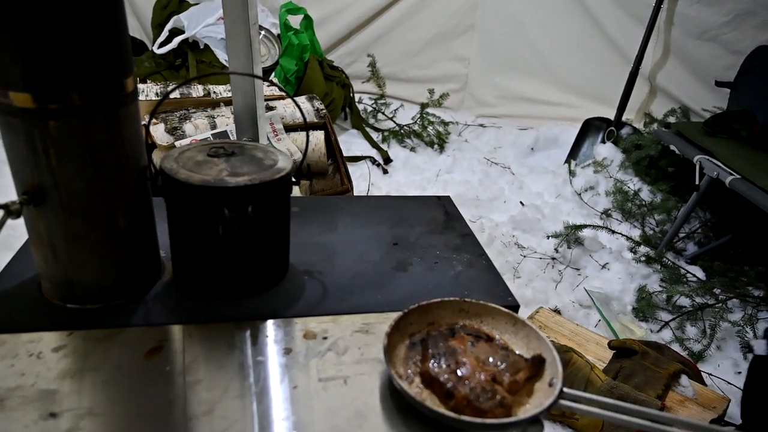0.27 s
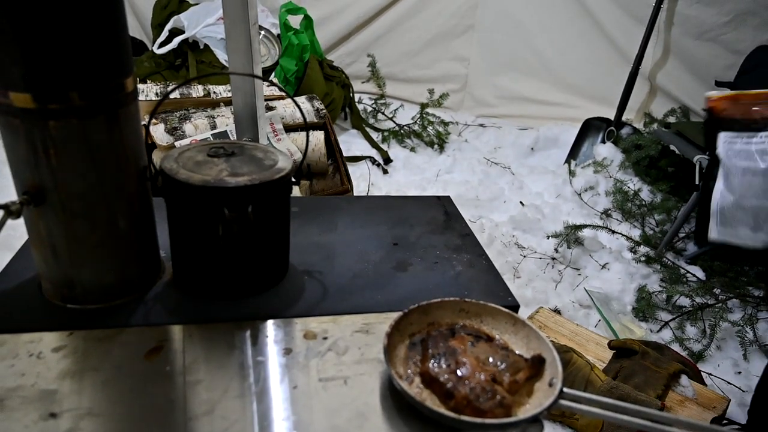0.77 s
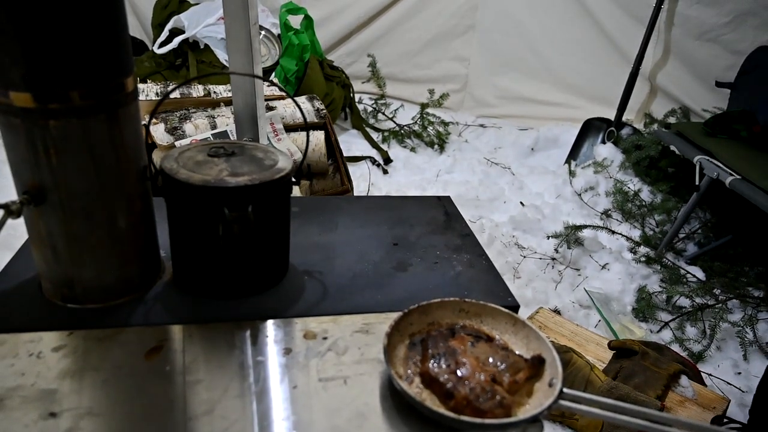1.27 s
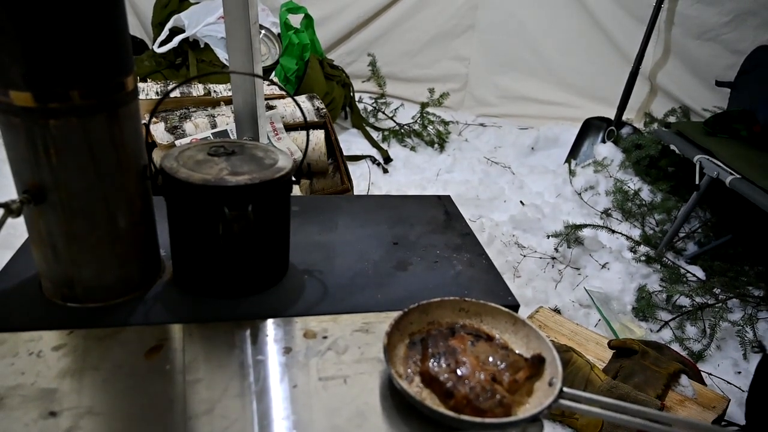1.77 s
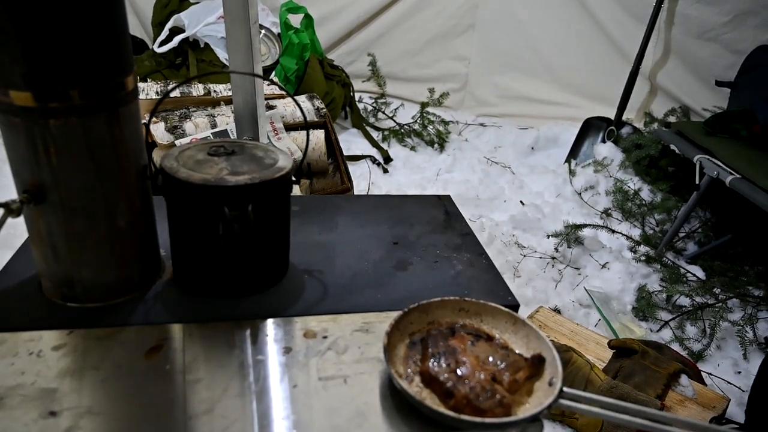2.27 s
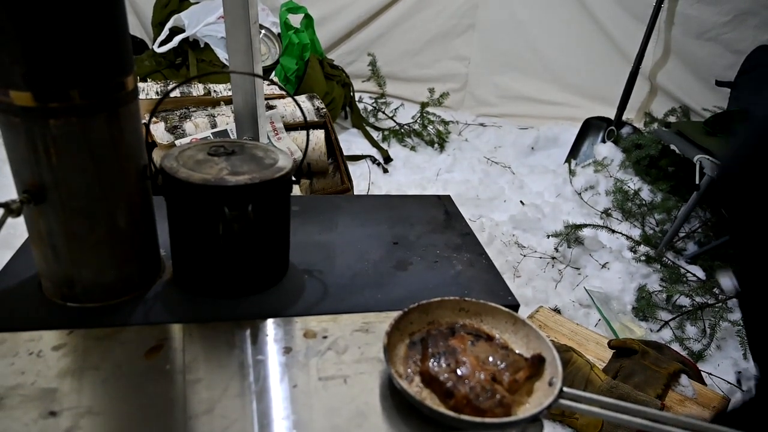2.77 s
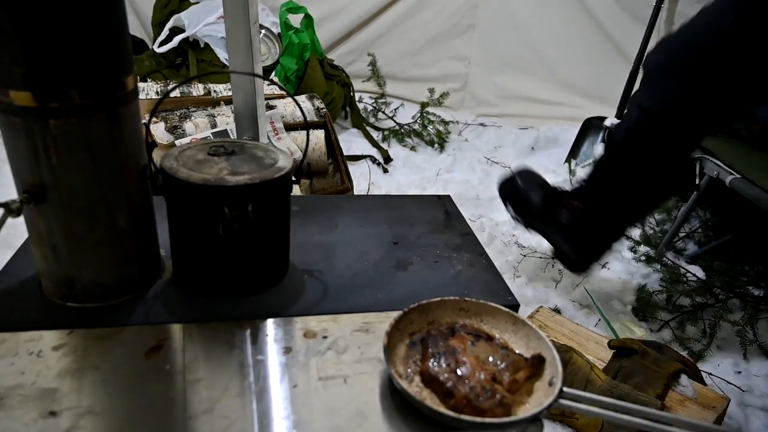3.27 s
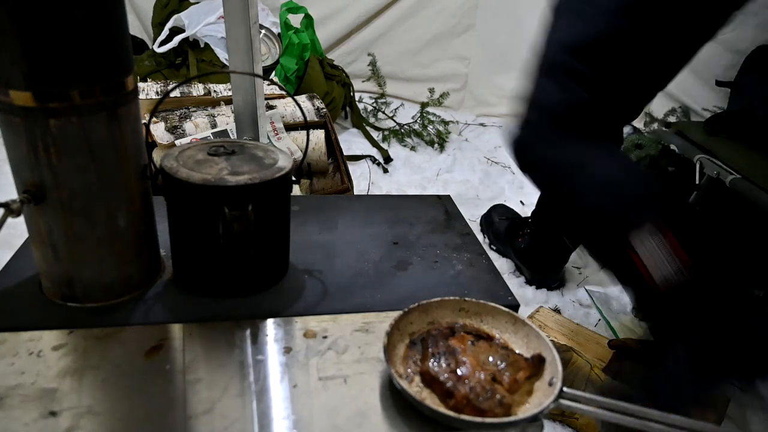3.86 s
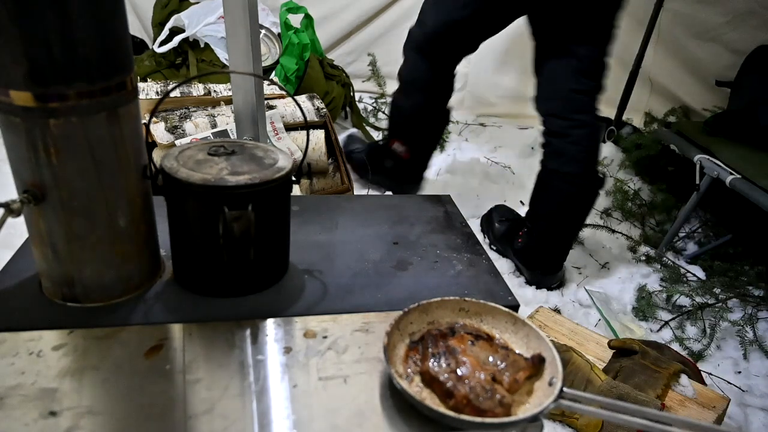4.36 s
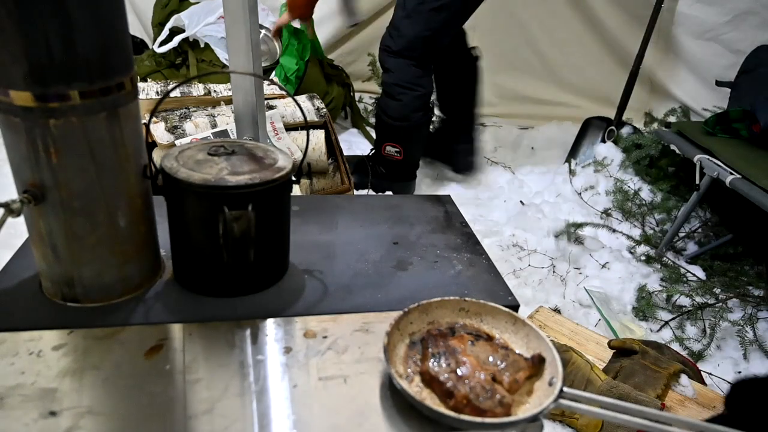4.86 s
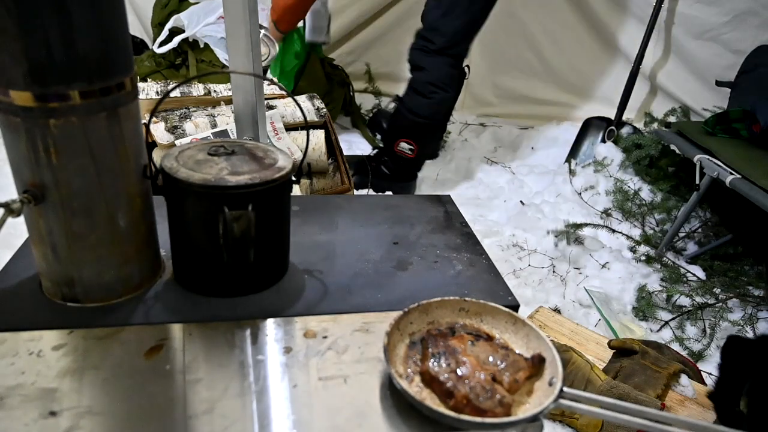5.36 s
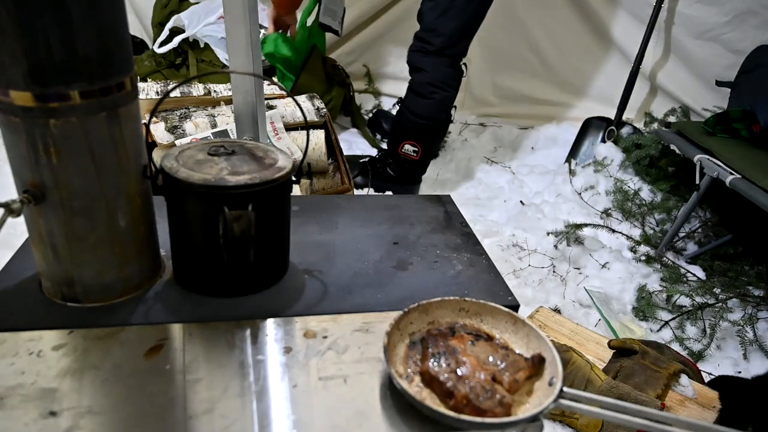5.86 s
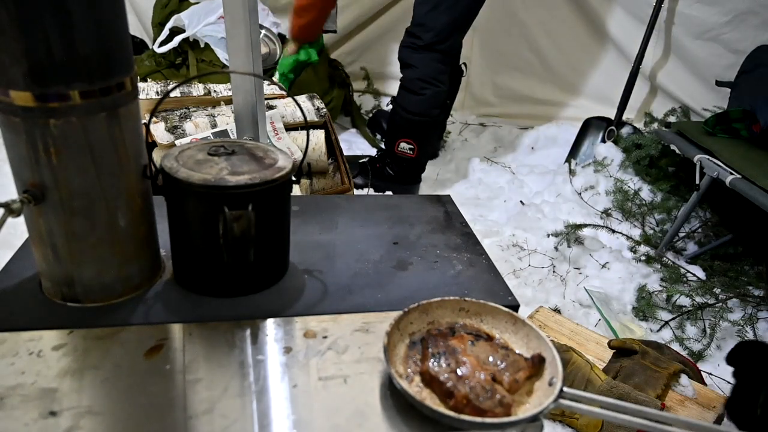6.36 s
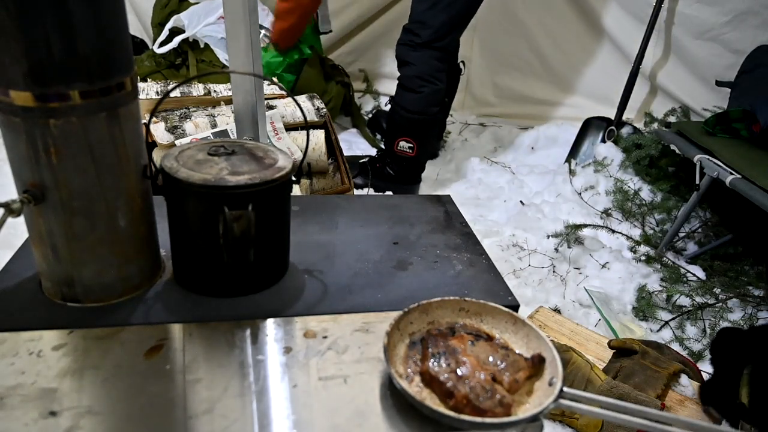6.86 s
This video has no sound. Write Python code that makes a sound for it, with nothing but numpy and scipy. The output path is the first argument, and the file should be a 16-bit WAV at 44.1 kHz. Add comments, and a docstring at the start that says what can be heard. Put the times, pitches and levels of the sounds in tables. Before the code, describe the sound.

Inside a small canvas tent, boots and cloth shift lightly on packed snow, with early small snaps and muffled thuds. The movement thickens into crisp crunching steps, hardest in the middle, then dwindles to shuffles and scattered ticks. A wood stove draws softly throughout. Close stereo microphone, short dry tail, steps drifting slightly from right to left.

```python
"""Winter boots shuffle and step on packed snow and twigs inside a small canvas tent.
Snow crunch and cloth rustle are swelling streams of random grains; settling weight adds darker grains.
Heels thud as wobbling low sines, rubber and dry snow squeak as noise in narrow resonances.
Twigs and buckles snap as short resonant noise bursts; a hard buckle or pole rings when tapped.
A wood stove draws softly nearby as fluttering filtered noise; near canvas walls add a short tail."""
import sys
import numpy as np
from scipy import signal
from scipy.io import wavfile
from scipy.ndimage import uniform_filter1d, map_coordinates

SR = 44100
rng = np.random.default_rng(int(sys.argv[2]) if len(sys.argv) > 2 else 0)


def voltage_ratio(level):
    """Linear amplitude factor for a level in decibels (scalar or array-like)."""
    return 10 ** (np.asarray(level, float) / 20)


def output_pcm(signal):
    """Save a mono or channel-first signal as 16-bit PCM at the path in sys.argv[1].

    Samples are clipped to [-1, 1] before scaling.
    """
    pcm = np.clip(np.atleast_2d(signal).T, -1, 1) * 32767
    wavfile.write(sys.argv[1], SR, np.round(pcm).astype(np.int16))


N = 313992  # samples

# boot soles and cloth drag: top of the stroke t/s, rise t/s, fall t/s, relative crush level/dB,
# fine fizz over the crush level/dB
DRAG_STROKES = [(0.112,0.053,.12,-56,-16),(0.17,0.054,0.11,-56,-11),(0.284,0.33,0.14,-44.5,-7.5),(0.436,0.088,.12,-60,3),(0.58,0.041,.07,-56,0.5),
                (0.668,0.04,0.12,-45,-6),(0.714,0.11,0.019,-44.5,-2),(0.818,0.018,0.14,-42,-6),(0.874,0.082,0.028,-38.5,1),(1.134,0.087,0.22,-48.5,0.5),
                (1.19,.15,0.15,-47.5,-10),(1.353,0.0088,0.078,-35,-1),(1.397,0.043,0.056,-45.5,-2),(1.55,0.09,0.042,-48,-2.5),(1.644,.05,0.31,-52,-2),
                (1.748,.04,.06,-53,0),(1.99,0.04,0.13,-58,-4),(2.07,0.022,.018,-49.5,-12),(2.136,0.033,.025,-37,-7),(2.25,0.055,0.28,-52.5,-7.5),
                (2.44,0.12,0.11,-42,-0.5),(2.49,.07,0.046,-40.5,-9),(2.52,0.014,0.045,-34,-7.5),(2.612,0.017,0.059,-37,-1.5),(2.664,0.014,0.062,-33,-0.5),(2.735,0.023,0.053,-39.5,3),
                (2.798,0.009,0.092,-41,-7),(2.9,0.31,0.16,-47,-3),(2.97,0.088,.18,-44,-5.5),(3.054,.1,.25,-51,-6.5),(3.17,0.13,0.15,-51,-1),
                (3.225,0.037,0.19,-46,0),(3.317,0.042,0.05,-39.5,-3.5),(3.364,.005,0.039,-40.5,10),(3.445,0.16,.03,-53.5,-19),(3.495,0.019,0.015,-33.5,-8),
                (3.575,0.01,.15,-49.5,11),(3.649,0.082,0.066,-35,3),(3.76,0.081,0.079,-49,3.5),(3.81,.07,.03,-57,-13),(3.83,0.016,0.018,-39,7.5),
                (3.864,0.01,0.18,-33.5,-6),(3.942,0.22,0.04,-33.5,-11),(3.986,0.0078,0.031,-34,0.5),(4.04,.1,0.17,-57,-5),(4.112,0.055,.15,-53,0),
                (4.24,0.067,.1,-53.5,6.5),(4.286,0.14,0.15,-48,0.5),(4.432,0.031,0.17,-44,5.5),(4.484,0.089,0.084,-40,0),(4.54,.02,0.039,-33.5,-3.5),
                (4.64,0.31,0.16,-47.5,2.5),(4.8,0.14,.1,-57,1.5),(4.89,0.044,0.016,-48.5,-5),(4.959,0.021,0.25,-39.5,6.5),(4.999,0.065,0.22,-43,-1),
                (5.061,0.11,0.034,-32.5,-11),(5.11,0.077,0.066,-45.5,3),(5.16,0.013,0.22,-38,-3),(5.376,.2,0.12,-39.5,-5.5),(5.466,0.24,0.18,-49,0),
                (5.54,0.18,.07,-47.5,1),(5.626,0.087,0.54,-52,-4),(5.828,0.033,0.11,-48,5.5),(5.87,0.31,0.036,-50.5,-8),(6.256,0.075,0.11,-53,-3),
                (6.33,.04,0.077,-53,1),(6.504,.16,0.087,-45,-3.5),(6.578,0.16,.1,-45.5,-3),(6.712,0.16,0.45,-55.5,-5),(6.815,0.026,0.044,-42.5,-2.5),
                (6.99,0.012,0.068,-39.5,-3),(7.056,0.061,0.29,-33.5,-2)]
# weight settles on the snow: top of the stroke t/s, rise t/s, fall t/s, relative weight level/dB,
# floor rumble over the weight level/dB
WEIGHT_STROKES = [(0.005,.02,0.078,-52,1),(0.112,.05,0.18,-58.5,10),(0.436,0.14,0.16,-53.5,-8),(0.714,0.16,0.025,-46.5,-25),(0.802,0.0091,0.023,-44,-17),
                  (1.134,0.15,0.1,-46,-14),(1.353,0.0076,0.061,-29.5,-17),(1.397,0.063,0.03,-37,-10),(1.55,.03,0.04,-48.5,-16),(1.6,0.038,.05,-67,18.5),
                  (1.644,0.047,0.081,-51,-18),(1.834,0.081,0.18,-60,-9),(2.07,0.029,.03,-45.5,-25),(2.136,0.035,0.019,-32,-18),(2.44,0.13,.15,-37.5,-24),
                  (2.518,.15,0.041,-37.5,-25),(2.664,0.014,0.2,-40.5,-9),(3.17,.07,.05,-64,10),(3.445,0.092,0.045,-63.5,8),(3.495,0.022,0.034,-30,-11),
                  (3.649,0.08,0.078,-35,-0.5),(3.759,.1,0.095,-41.5,-11),(3.83,0.021,.025,-35,-28),(4.24,0.042,0.054,-54,-7),(4.484,0.077,0.049,-36.5,-0.5),
                  (4.54,0.015,.055,-36,1),(4.64,0.28,0.11,-45.5,-1),(4.999,.12,0.15,-41,-5),(5.107,0.13,0.068,-41.5,1),(5.278,0.07,0.13,-55.5,0),
                  (5.466,0.25,0.12,-48.5,0),(5.57,0.11,0.042,-52.5,-10),(6.39,0.045,0.11,-58.5,3),(6.666,.05,.05,-68,15),(6.879,0.018,0.05,-53,1)]
# spectrum of crushed snow: f/Hz, relative density level/dB
CRUSH_SPECTRUM = [(290, -21.5), (500, -6), (981, -2), (1130, -4.5), (1350, -0.5), (1540, -3.5),
                  (2200, -1.5), (7000, -14.5), (9100, -36), (15400, -120)]
# spectrum of snow under load: f/Hz, relative density level/dB
WEIGHT_SPECTRUM = [(76, -24), (130, -9.5), (199, -9.5), (273, -3), (308, -3.5), (384, -1.5), (514, -11.5),
                   (589, -4.5), (1000, -12.5), (1300, -44), (2200, -120)]
# spectrum of the fine fizz: f/Hz, relative density level/dB
FIZZ_SPECTRUM = [(2500, -26.5), (4000, 1.5), (6000, 3), (8000, 0), (11000, -1), (15000, -1.4), (18000, -19)]
# spectrum of the shaking floor: f/Hz, relative density level/dB
RUMBLE_SPECTRUM = [(25, -50), (45, -0.5), (60, -1), (75, -3.5), (120, -6.5), (180, -30)]
# spectrum of the stove draught: f/Hz, relative density level/dB
STOVE_SPECTRUM = [(15, -27), (25, -20), (145, 5), (236, -11), (416, -6), (560, -12), (775, -9.5),
                  (887, -14), (1330, -13.5), (2610, -20), (3080, -20), (11000, -27), (14800, -24.5),
                  (16000, -19.5)]
# heel and sole thuds: t/s, peak of the snow pack level/dB, deep push over the pack level/dB,
# pack decay t60 t/s, nominal pitch f/Hz
THUDS = [(0.086, -44, 3, 0.2, 178), (0.522, -36, -5.5, 0.13, 317), (0.743, -37, -30, 0.08, 241),
         (1.347, -27.5, -31, 0.1, 252), (1.378, -27.5, -26, 0.069, 376), (1.496, -39, -7, 0.14, 418),
         (2.122, -30.5, -12, 0.1, 420), (2.391, -29, -36, 0.11, 378), (2.469, -26.5, -38, 0.094, 355),
         (2.654, -31, -20, 0.13, 272), (3.046, -33.5, -27, 0.045, 489), (3.482, -12.5, -2, 0.032, 375),
         (3.629, -24.5, -22, 0.14, 309), (3.746, -27, -18, 0.075, 285), (3.808, -39, -32, 0.091, 273),
         (4.226, -42.5, -21, 0.13, 418), (4.464, -31, -27, 0.23, 314), (4.528, -18, -8, 0.055, 256),
         (4.956, -40, 1.5, 0.15, 344), (6.867, -46, 4, 0.048, 171)]
# modes of packed snow under a blow: multiple of the pitch, relative level/dB
PACK_MODES = [(1, 10), (1.25, -5.5), (2.1, -2.5), (3.1, -8.5)]
# rubber and dry snow squeak: t/s, length t/s, f/Hz, rms before the fades level/dB
SQUEAKS = [(0.103, 0.097, 3900, -55.5), (0.204, 0.052, 482, -49.5), (0.276, 0.057, 638, -49),
           (0.839, 0.014, 716, -44), (.85, 0.051, 2650, -42.5), (.855, 0.041, 2120, -42),
           (3.693, 0.036, 1630, -47), (3.704, 0.03, 4050, -49.5), (4.602, .04, 680, -55),
           (5.158, 0.083, 1354, -43), (5.81, .06, 2220, -50.5)]
# sharp snaps: t/s, body peak level/dB, ring f/Hz, gain of the added treble level/dB, decay t60 t/s
SNAPS = [(0.5272,-13,2740,-25,0.059),(0.751,-12,2460,-33,.021),(1.039,-36.5,1890,-62,0.061),(1.071,-47,4000,-45,.05),(1.295,-44,2050,-60,.05),
         (1.347,-20,1030,-35,0.033),(1.505,-24.5,1090,-42,0.12),(1.6322,-34,1100,-42,0.046),(2.0069,-31.5,2020,-49,0.075),
         (2.0457,-24,4830,-41,0.043),(2.217,-30,3100,-39,0.039),(2.4423,-16,3130,-25,0.025),(2.4743,-20,3100,-47,.043),
         (2.4908,-14,2060,-43,.033),(2.504,-27,4500,-38,.02),(2.5138,-13,1880,-43,0.027),(2.6063,-20,2780,-33,0.057),(2.6165,-19,3500,-23.5,0.055),
         (2.665,-8.5,2610,-19.5,0.016),(2.7314,-16.5,2450,-23.5,0.016),(2.7945,-19.5,1500,-47,0.019),(2.9228,-16.5,2000,-37,0.039),
         (3.0944,-35,1840,-58,0.053),(3.1296,-33,2400,-54,0.037),(3.227,-26.5,2980,-46,.074),(3.2983,-26,4280,-46,.044),
         (3.313,-23.5,1710,-54,0.091),(3.359,-11.5,2270,-17.5,0.021),(3.482,-22,1050,-28,0.056),(3.787,-43,1900,-51.5,0.042),
         (3.816,-20,5400,-32,.02),(3.8215,-17.5,1660,-35,0.05),(3.8639,-10.5,1810,-33,0.04),(3.8678,-7.5,2030,-17.5,0.042),(3.913,-20,2150,-42,0.044),(3.928,-23.5,2400,-42,0.045),(3.945,-17,2170,-41,0.047),
         (3.9813,-18,2040,-34,0.035),(4.2138,-34.5,3690,-43,0.033),(4.2354,-26.5,1650,-37,0.033),(4.261,-34,3300,-55,.03),(4.276,-35,3400,-50,.03),(4.3103,-32,5500,-31,0.045),
         (4.5358,-25,1060,-34,.05),(4.8665,-31,1500,-58,.05),(4.927,-32,990,-40,.031),(5.112,-30,2500,-35,0.029),(5.3766,-26.5,3060,-37,0.053),
         (5.5558,-25.5,3150,-54,.031),(5.6116,-43,1060,-34,.037),(5.666,-38,910,-54,0.038),(5.773,-36,1990,-57,.036),(5.878,-29.5,1500,-59,0.054),
         (6.0216,-15,3100,-22,0.025),(6.244,-48,950,-36,0.04),(6.311,-32,1150,-36,0.05),(6.668,-50,6500,-46,.04),(6.7617,-61,1320,-37,0.046),
         (6.808,-25.5,4500,-44,0.041),(6.989,-27,3300,-45,.04),(7.003,-22,3000,-36,.02),(7.008,-20.5,1730,-42,0.037),(7.057,-22.5,1300,-28,.044)]
# modes of a hard buckle or pole: f/Hz, relative level/dB, decay t60 t/s
KNOCK_MODES = [(1500, -3, 0.035), (1820, 3, 0.019), (1900, 13.5, 0.024), (2060, -3, 0.097),
               (2480, 7.5, 0.026), (2740, 2.5, 0.032), (3400, -5, 0.024), (3700, -3, 0.023)]
# taps on that buckle or pole: t/s, peak level/dB
KNOCKS = [(2.9227, -12), (4.8664, -36), (5.8775, -28.5)]
# the walker moves off: t/s, delay of the left side in samples, left minus right level/dB
WALKER_PATH = [(0, 3., -2.5), (1.5, 2.5, -2.5), (2.7, 3, -2), (3.3, 3, -1), (3.8, 1.15, -0.4),
               (5.5, 0.6, 0), (6.2, -1.5, 1), (7.12, -1, 2)]


def evened(x):
    """Scales to rms 1."""
    return x / np.sqrt(np.mean(x ** 2) + 1e-20)


def add(mix, s, sound):
    """Mixes a sound in at s seconds, cut at the end of the scene."""
    part = mix[..., round(s * SR):][..., :sound.shape[-1]]
    part += sound[..., :part.shape[-1]]


def coloured(x, points):
    """Causal minimum-phase filter drawn through (f/Hz, level/dB) points, scaled to rms 1."""
    hz, db = np.transpose(points)
    bins = abs(np.fft.fftfreq(4096, 1 / SR))
    curve_db = np.interp(np.log(bins + 1), np.log(hz + 1), np.maximum(db, -80))
    log_gain = curve_db * np.log(10) / 20
    taps = np.fft.ifft(np.exp(np.conj(signal.hilbert(log_gain)))).real
    taps = taps.reshape((1,) * (x.ndim - 1) + (-1,))
    return evened(signal.oaconvolve(x, taps, axes=-1)[..., :N])


def resonate(x, hz, width):
    """A resonance of gain 1, width in Hz, that follows the pitch curve hz."""
    turn = np.exp(2j * np.pi * np.cumsum(hz) / SR)
    r = np.exp(-np.pi * width / SR)
    return 2 * (turn * signal.lfilter([1 - r], [1, -r], x / turn)).real


def sided(pan_db):
    """Left and right gains for a left-minus-right level in dB."""
    return voltage_ratio(np.array([pan_db / 2, -pan_db / 2]))


def swells(rows):
    """Powers of overlapping strokes add: level curves in dB of the main and of the second layer."""
    edge_db, rounding = -20, 1.204  # level one rise before and one fall after the top; curve power
    s, rise, fall, db, over_db = np.transpose(rows)[:, :, None]
    t = np.arange(0, N / SR + .002, .002)
    away = np.where(t < s, (s - t) / rise, (t - s) / fall)
    main = voltage_ratio(2 * (db + edge_db * away ** rounding))
    second = main * voltage_ratio(2 * over_db)
    time = np.arange(N) / SR
    return [np.interp(time, t, 10 * np.log10(p.sum(0) + 1e-9)) for p in (main, second)]


def grains(per_s, spread_db, smooth):
    """Crystals break at random, a few loudly, over a smooth bed."""
    size = voltage_ratio(spread_db * np.minimum(rng.exponential(1, N), 4))
    breaks = size * (rng.random(N) < per_s / SR) * rng.choice([-1., 1.], N)
    return evened(evened(breaks) + smooth * rng.standard_normal(N))


def strokes():
    """One stream of grains sounds as crush and fizz; sparser breaks carry the weight over a floor rumble."""
    drag_weight_db, idle_rumble_db = -10, -68.5  # every drag loads the snow; the floor is never still
    grit, clump_db = 0.35, 1.75  # share of grains; rms swing of the clumps in dB
    crush_db, fizz_db = swells(DRAG_STROKES)
    press_db, shake_db = swells(WEIGHT_STROKES)
    weight_db = np.maximum(press_db, crush_db + drag_weight_db)
    rumble_db = np.maximum(shake_db, idle_rumble_db)

    clumps = voltage_ratio(clump_db * evened(uniform_filter1d(rng.standard_normal(N), 300)))
    gritty = grit * grains(per_s=1200, spread_db=4.5, smooth=0.23)
    fine = clumps * (gritty + 0.5 * rng.standard_normal(N)) / np.hypot(grit, .6)
    patch = np.array([grains(per_s=1900, spread_db=2.0, smooth=0.53) for side in "LR"])
    spread = fine + 1.7 * clumps * patch  # a wide patch of snow
    coarse = 0.16 * fine + clumps * grains(per_s=400, spread_db=4.0, smooth=0.68)

    # the rasp sinks 0.2 octave per dB as weight outgrows the crush
    rasp_hz = 1500 * 2 ** (0.2 * np.maximum(crush_db - weight_db, -12))
    rasp = resonate(resonate(fine, rasp_hz, width=1200), rasp_hz, width=1200)
    crush = coloured(fine, CRUSH_SPECTRUM) + 0.25 * evened(rasp)
    upper = voltage_ratio(crush_db) * evened(crush) + voltage_ratio(fizz_db) * coloured(spread, FIZZ_SPECTRUM)
    weight = voltage_ratio(weight_db) * coloured(coarse, WEIGHT_SPECTRUM)
    rumble = voltage_ratio(rumble_db) * coloured(rng.standard_normal(N), RUMBLE_SPECTRUM)
    return voltage_ratio(-1.0) * (upper + weight + rumble)


def stove():
    """A low fluttering draught and a faint even hiss, mostly unlike at left and right."""
    flutter = voltage_ratio(3.1 * evened(uniform_filter1d(rng.standard_normal(N), 3000)))
    shared, left, right = rng.standard_normal((3, N))
    noise = np.array([shared + 2.64 * left, shared + 3.0 * right])
    air = voltage_ratio(-52) * coloured(noise, STOVE_SPECTRUM)
    low = signal.sosfiltfilt(signal.butter(1, 700, fs=SR, output="sos"), air)
    return air + (flutter - 1) * low  # only the low part flutters


def thuds():
    """The boot lands and shakes the snow pack in quick bumps, over one deep push."""
    push_hz = 130.2  # nominal, detuned in each thud
    out, t = np.zeros(N), np.arange(8000) / SR
    for s, db, deep_db, t60, hz in THUDS:
        detune = rng.uniform(.92, 1.08, len(PACK_MODES) + 1)
        fade = voltage_ratio(-60 * t / t60) * np.minimum(t / .003, 1)
        pack = np.zeros(len(t))
        for (multiple, mode_db), shift in zip(PACK_MODES, detune):
            pack += voltage_ratio(mode_db) * np.sin(2 * np.pi * hz * multiple * shift * t)
        wobble = uniform_filter1d(uniform_filter1d(rng.standard_normal(len(t)), 90), 90)
        bumps = 1 + 0.55 * evened(wobble)
        pack = -pack * bumps * fade  # the snow gives way first, then pushes back
        push = np.sin(2 * np.pi * push_hz * detune[-1] * t) * fade ** 0.62  # dies more slowly
        add(out, s, voltage_ratio(db) * (pack / abs(pack).max() + voltage_ratio(deep_db) * push / abs(push).max()))
    # keeps the thuds free of a slow offset below the low tones
    return signal.lfilter(*signal.butter(3, 60, "high", fs=SR), out)


def squeaks():
    """Brief fuzzy tones: rubbing noise in a narrow resonance."""
    out = np.zeros(N)
    for s, length, hz, db in SQUEAKS:
        rub = rng.standard_normal(round(length * SR))
        pitch = np.full(len(rub), hz)
        tone = resonate(resonate(rub, pitch, width=0.11 * hz), pitch, width=0.11 * hz)
        add(out, s, voltage_ratio(db) * evened(tone) * signal.windows.tukey(len(tone), .6))
    return out


def snaps():
    """A crack rings a short broad mode, then splinters settle."""
    ring_share = 0.39  # of the ring over the broad crack
    crack, crack_db_per_db = 2.52, 0.36  # first break against the splinters, sharper in a loud snap
    out, t = np.zeros(N), np.arange(6000) / SR
    treble = signal.butter(3, 4800, "high", fs=SR)
    middle = signal.butter(2, [800, 7000], "band", fs=SR)
    for s, db, hz, treble_db, t60 in SNAPS:
        splinters = 0.71 * rng.standard_normal(len(t)) * voltage_ratio(-60 * t / t60)
        drive = splinters * np.minimum(t / 0.0022, 1)
        drive[10:16] += crack * voltage_ratio(crack_db_per_db * (db + 19)) * rng.choice([-1., 1.], 6)
        ring = resonate(drive, np.full(len(t), hz), width=0.17 * hz)
        broad = signal.lfilter(*middle, drive)
        top = signal.lfilter(*treble, drive)
        body = ring_share * ring / abs(ring).max() + (1 - ring_share) * broad / abs(broad).max()
        add(out, s, voltage_ratio(db) * body / abs(body).max() + voltage_ratio(treble_db) * top)
    return out


def knock():
    """A few close modes of a hard body start together, each dying at its own rate."""
    out, t = np.zeros(N), np.arange(6000) / SR
    ring = sum(voltage_ratio(db - 60 * t / t60) * np.sin(2 * np.pi * hz * t) for hz, db, t60 in KNOCK_MODES)
    ring = ring * np.minimum(t / 0.00082, 1)  # the blow lasts a moment
    for s, db in KNOCKS:
        add(out, s, voltage_ratio(db) * ring / abs(ring).max())
    return out


def tent(x, t60, wet_db):
    """Near canvas walls return a short dense tail, unlike at left and right and ever shifting."""
    t, out = np.arange(5000) / SR, x.copy()
    for k in range(3):  # three tails trade places over time
        tail = rng.standard_normal((2, 5000)) * (rng.random((2, 5000)) < .2)
        tail = tail * voltage_ratio(-60 * t / t60) * (t > .0025)
        tail = signal.lfilter(*signal.butter(1, 500, "high", fs=SR), tail)  # canvas lets the bass through
        share = np.sqrt(2 / 3) * np.cos(np.pi * (np.arange(N) / SR / .4 + k / 3))
        wet = signal.oaconvolve(x * share, tail / np.linalg.norm(tail[0]), axes=1)[:, :N]
        out += voltage_ratio(wet_db) * wet
    return out


def scene():
    """The walker's sound reaches left and right a moment apart, rings in the tent and joins the stove."""
    s, lag, pan_db = np.transpose(WALKER_PATH)
    time = np.arange(N) / SR
    walker = strokes() + thuds() + squeaks() + snaps() + knock()
    walker = walker * sided(np.interp(time, s, pan_db))
    delayed = np.arange(N) - np.interp(time, s, lag)
    walker[0] = map_coordinates(walker[0], [delayed], order=5)
    return tent(walker, t60=0.055, wet_db=-4.5) + stove()


def roll_off(x):
    """The treble ends steeply here."""
    return signal.sosfilt(signal.butter(12, 16950, fs=SR, output="sos"), x)


def record(dry):
    """Close left and right ports hear the bass alike; the top is band limited."""
    mid, side = (dry[0] + dry[1]) / 2, (dry[0] - dry[1]) / 2
    side = signal.sosfiltfilt(signal.butter(2, 920, "high", fs=SR, output="sos"), side)
    both = np.array([mid + side, mid - side])
    band_limit = signal.firwin(255, 15850, window=("kaiser", 4), fs=SR)
    both = signal.oaconvolve(both, band_limit[None], "same")
    return roll_off(both)


dry = scene()
out = record(dry)
output_pcm(out)
```